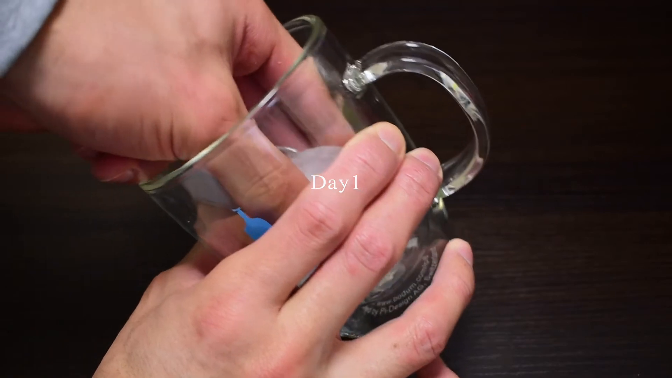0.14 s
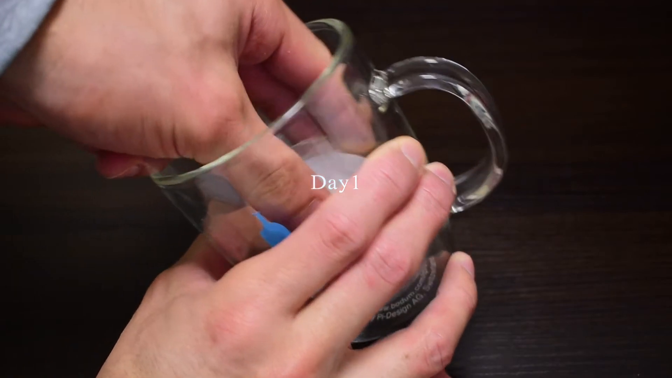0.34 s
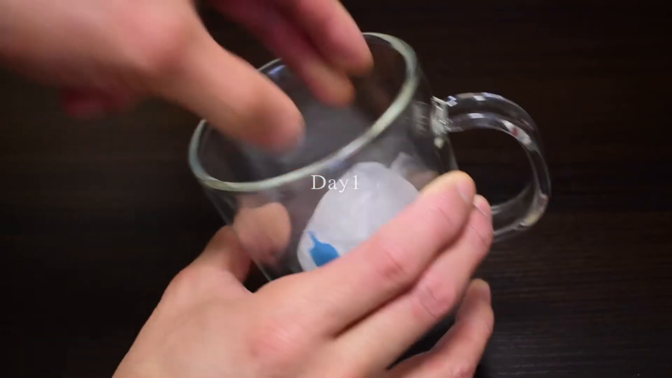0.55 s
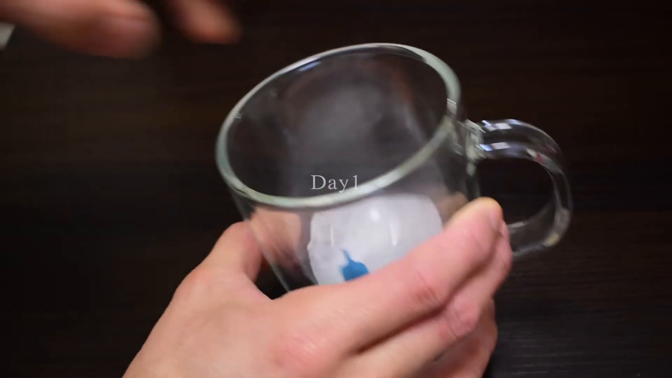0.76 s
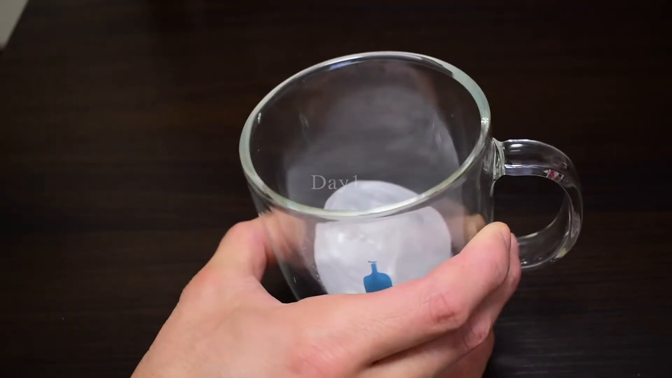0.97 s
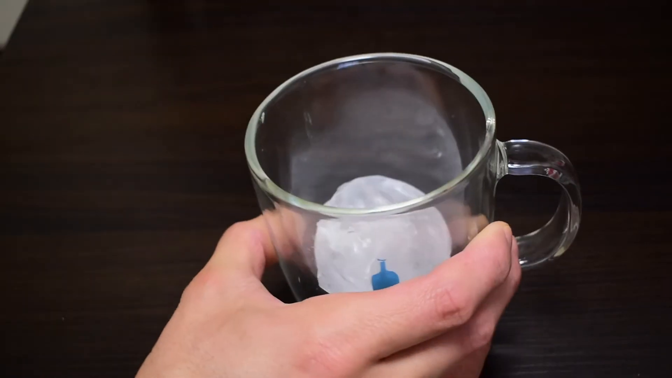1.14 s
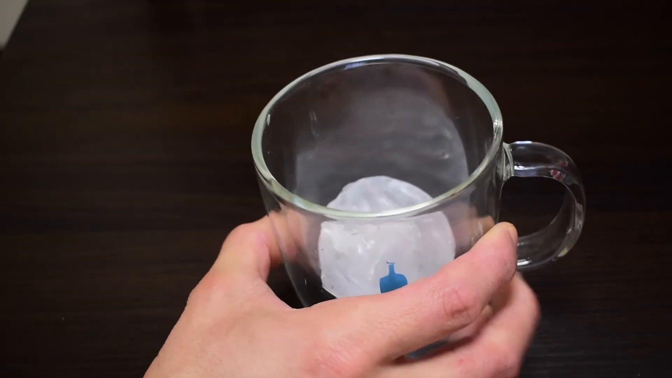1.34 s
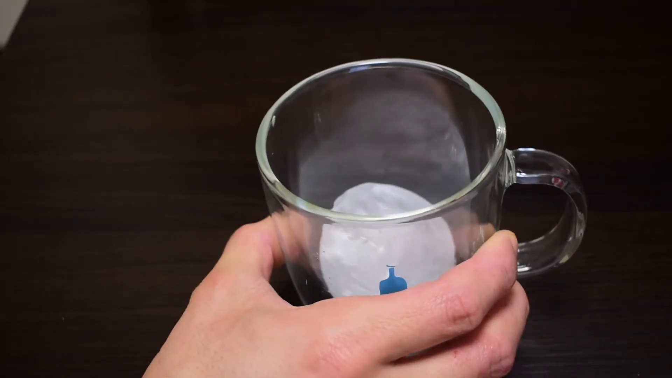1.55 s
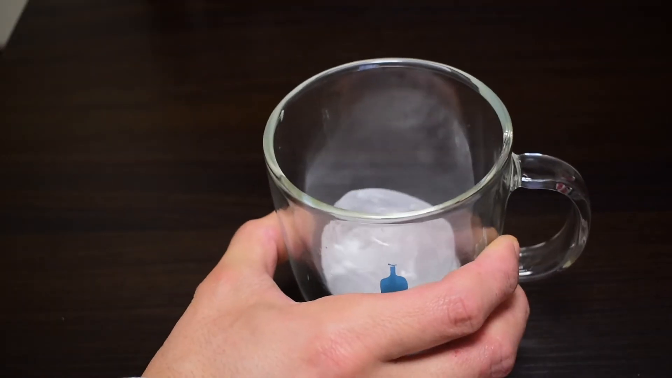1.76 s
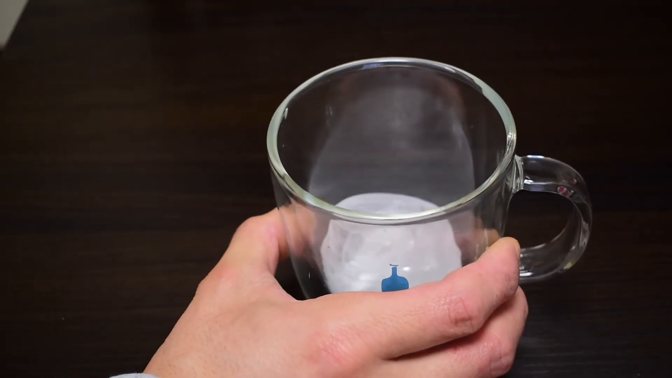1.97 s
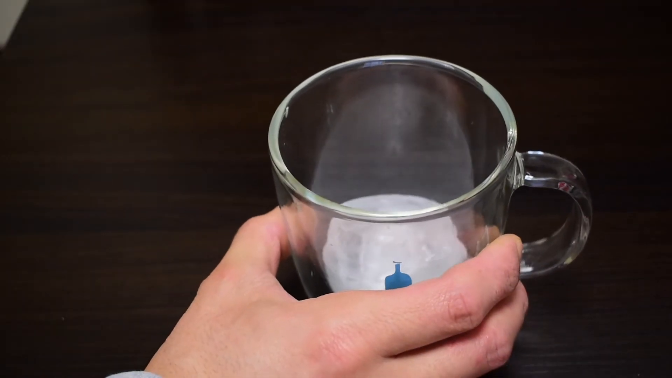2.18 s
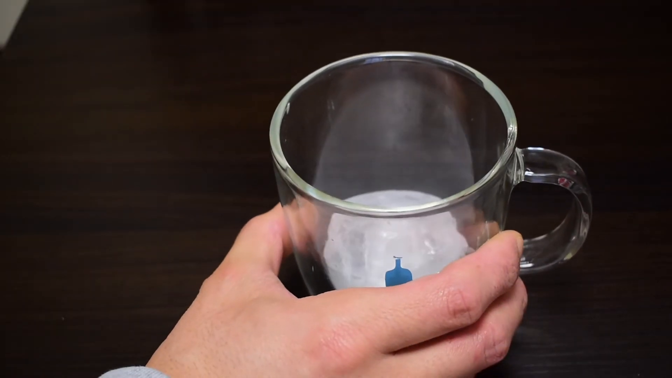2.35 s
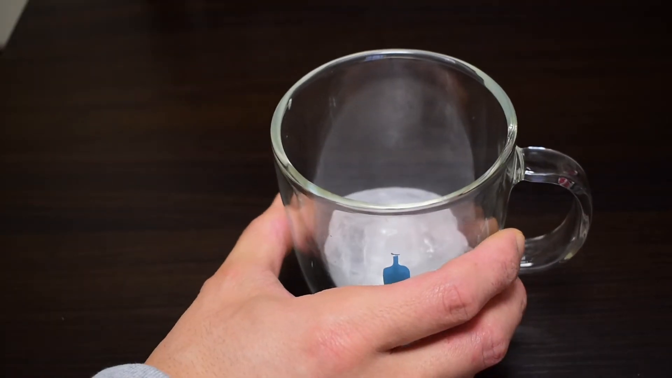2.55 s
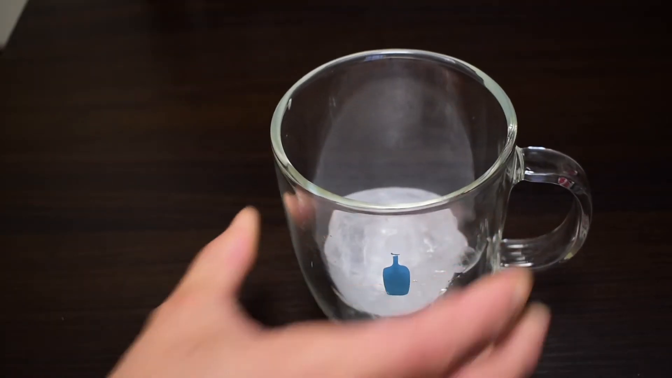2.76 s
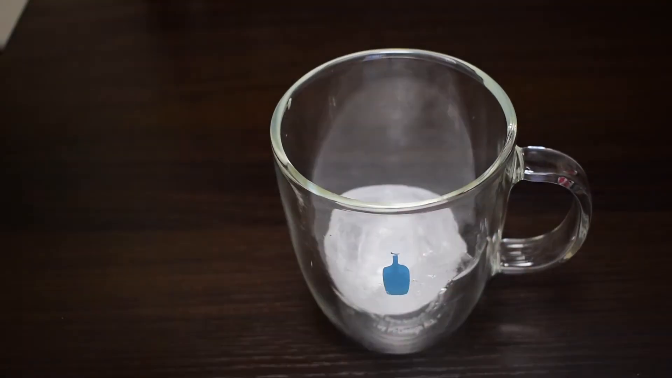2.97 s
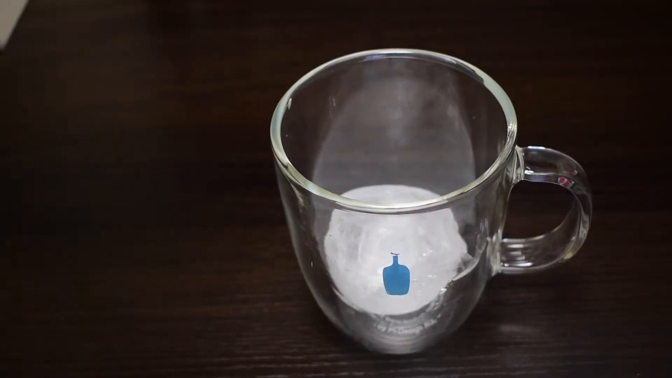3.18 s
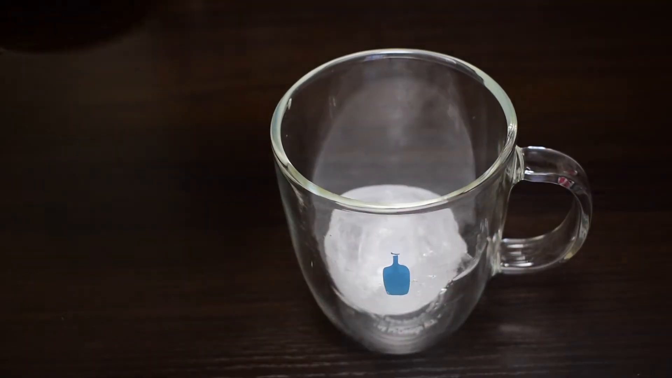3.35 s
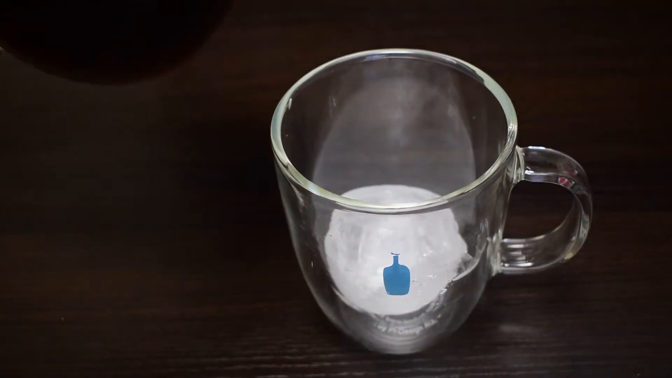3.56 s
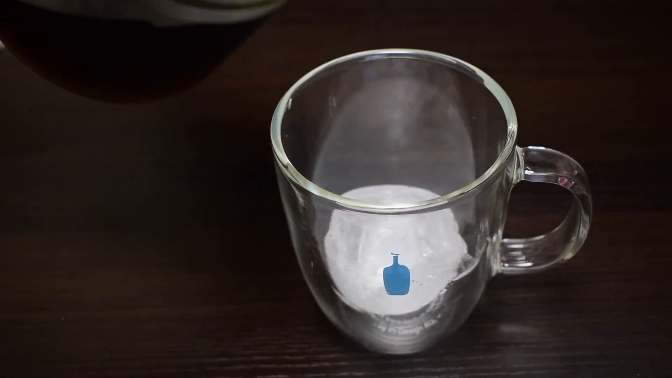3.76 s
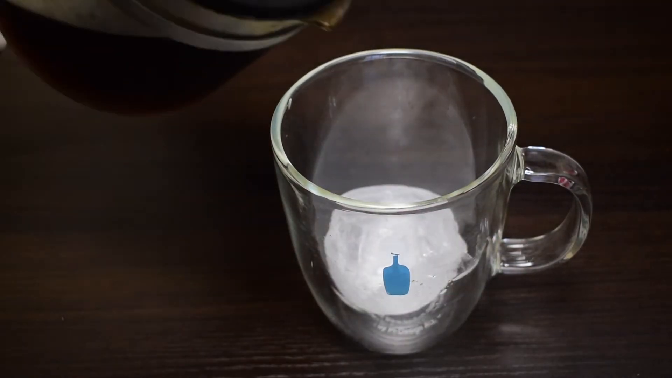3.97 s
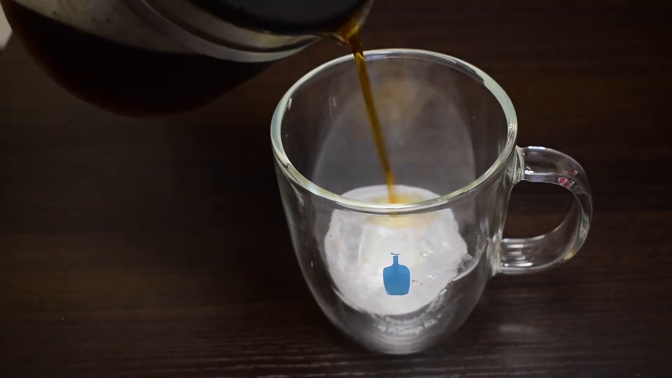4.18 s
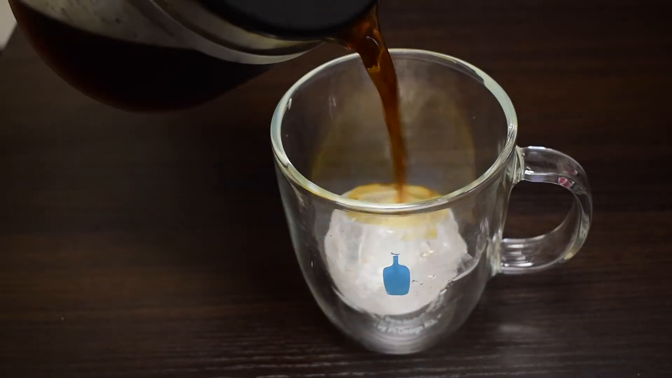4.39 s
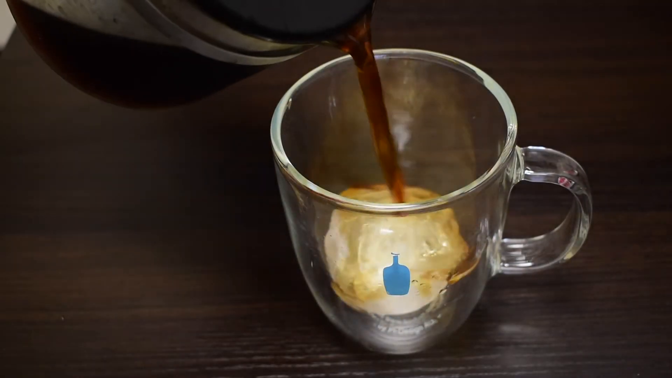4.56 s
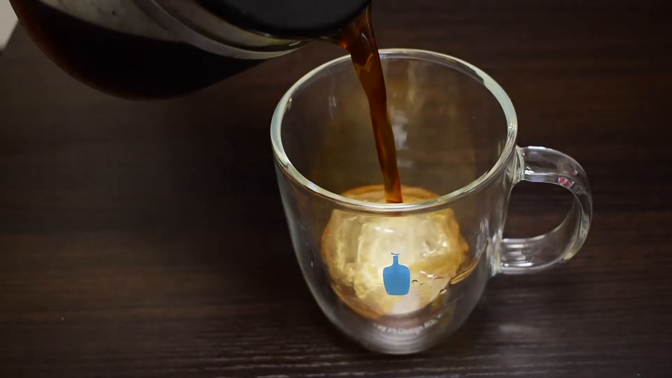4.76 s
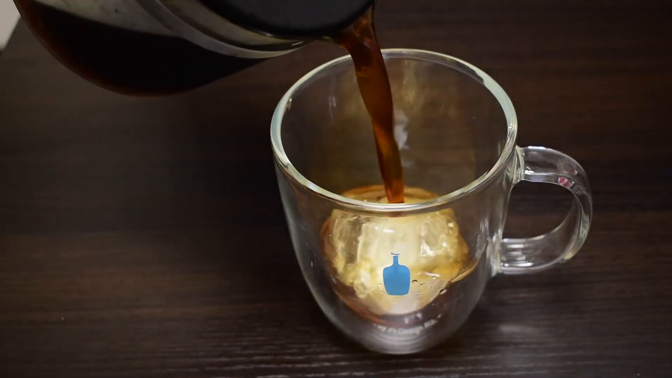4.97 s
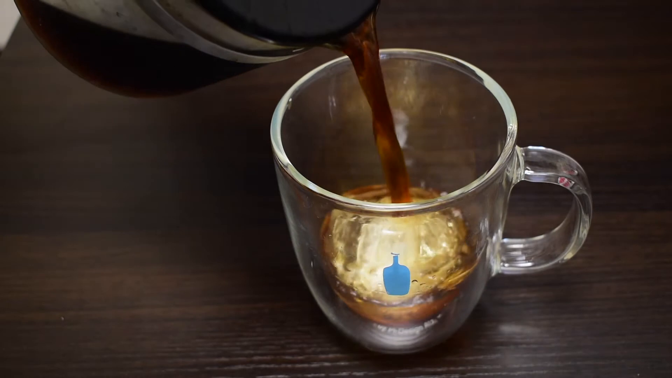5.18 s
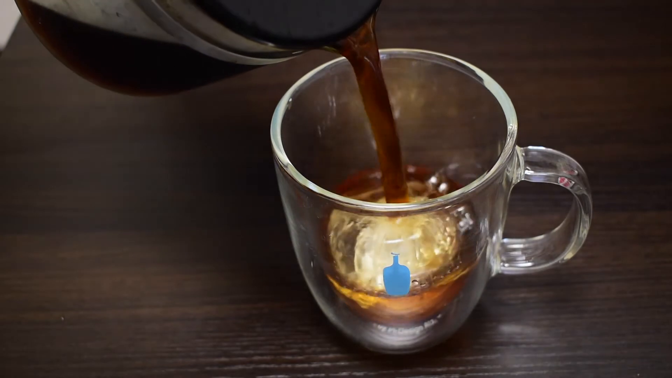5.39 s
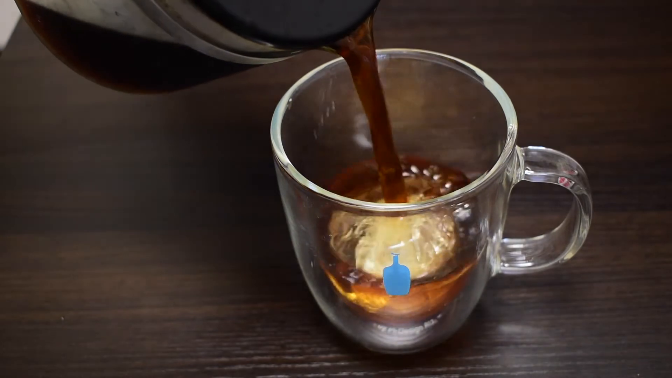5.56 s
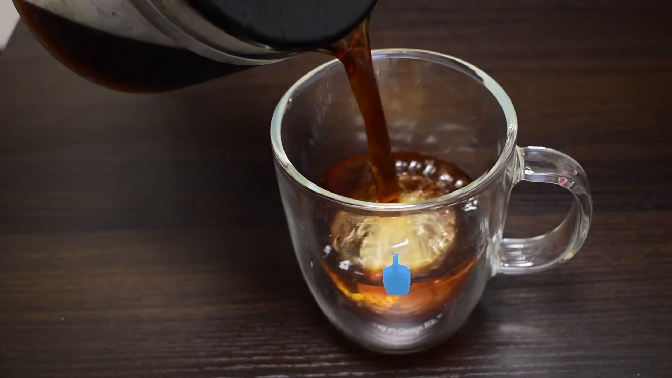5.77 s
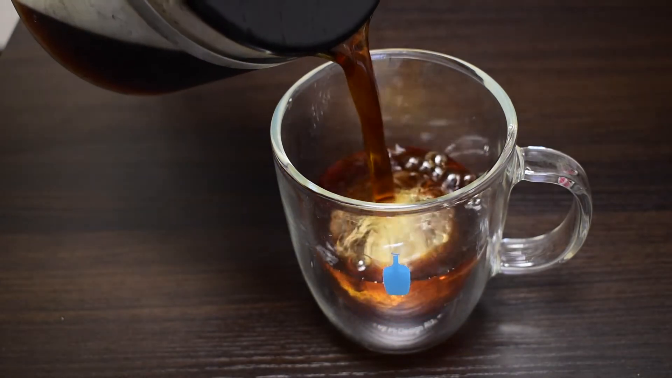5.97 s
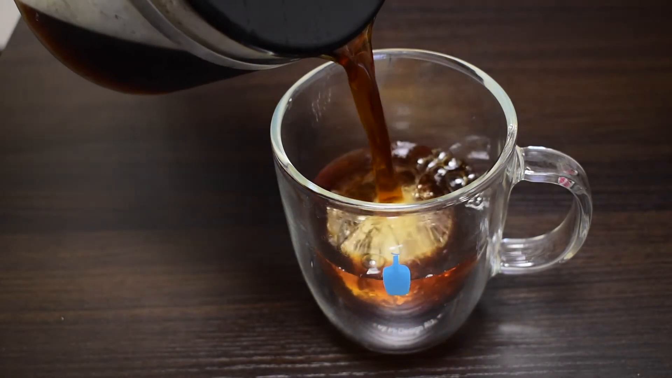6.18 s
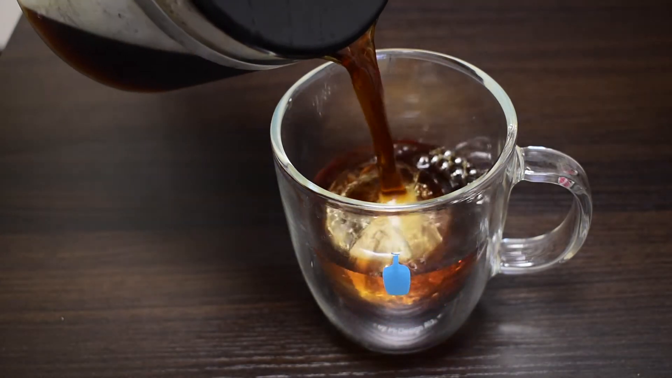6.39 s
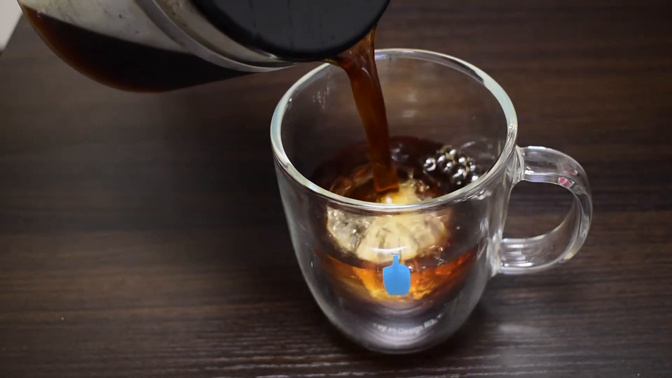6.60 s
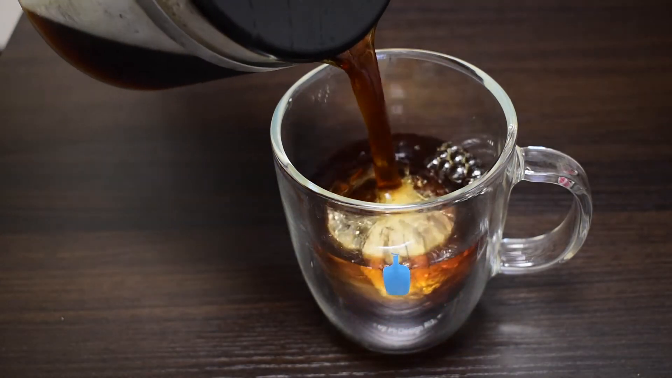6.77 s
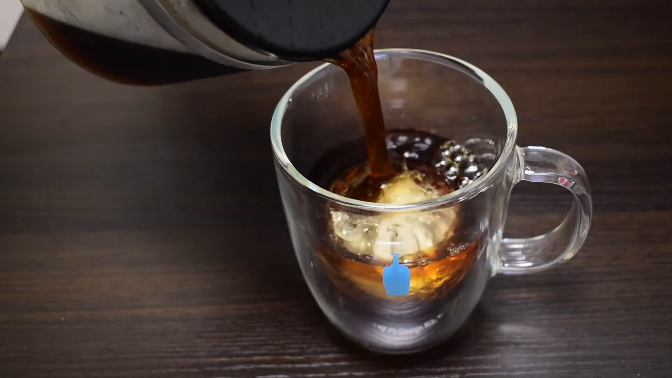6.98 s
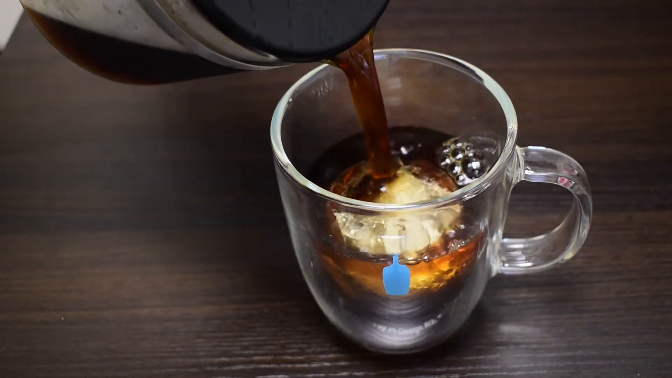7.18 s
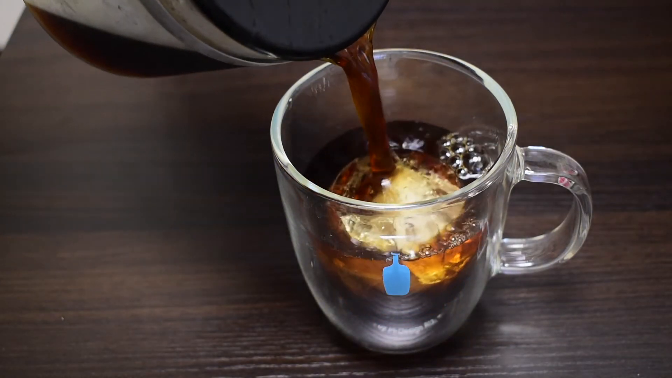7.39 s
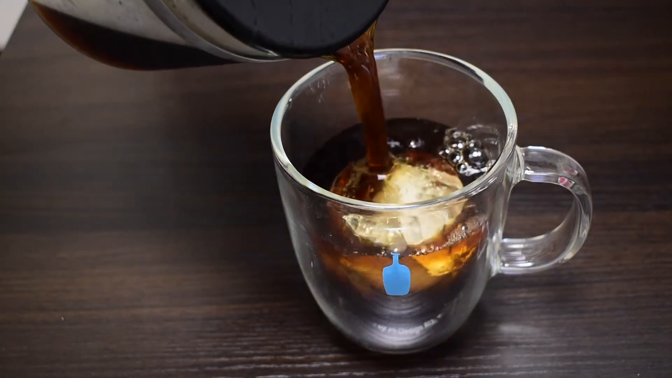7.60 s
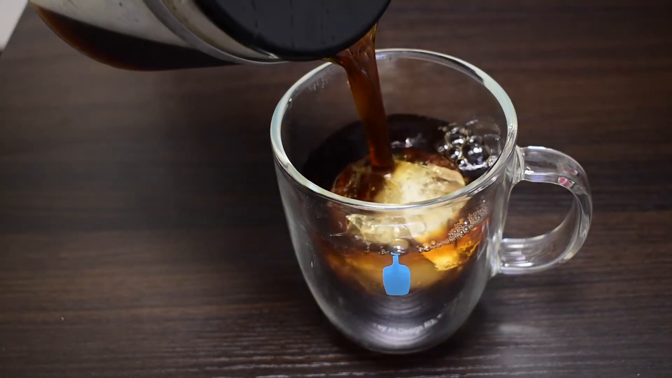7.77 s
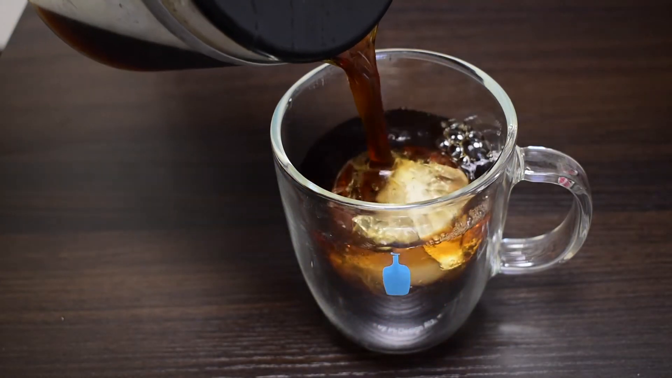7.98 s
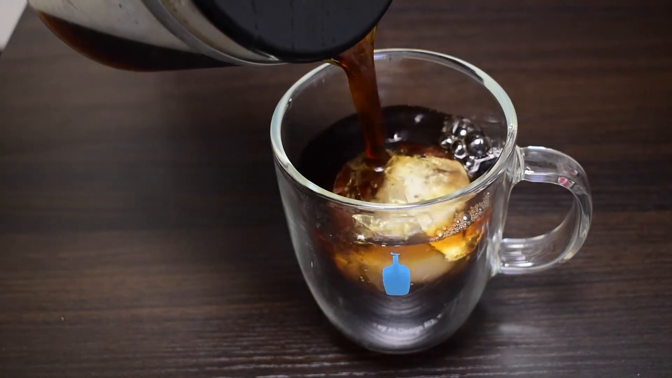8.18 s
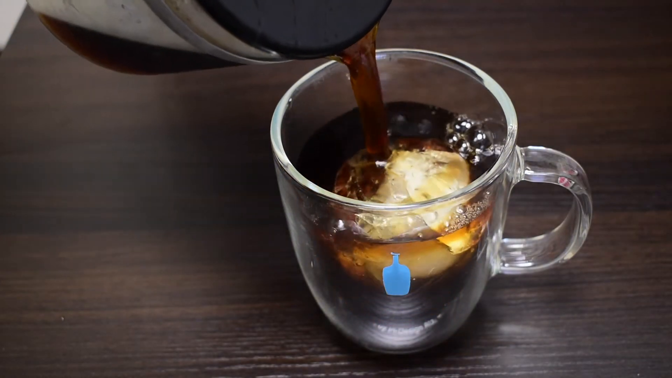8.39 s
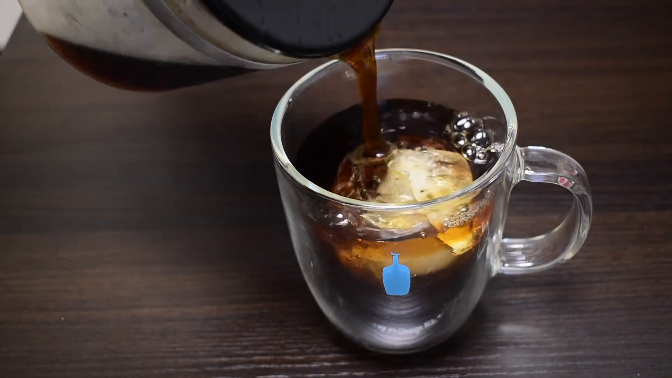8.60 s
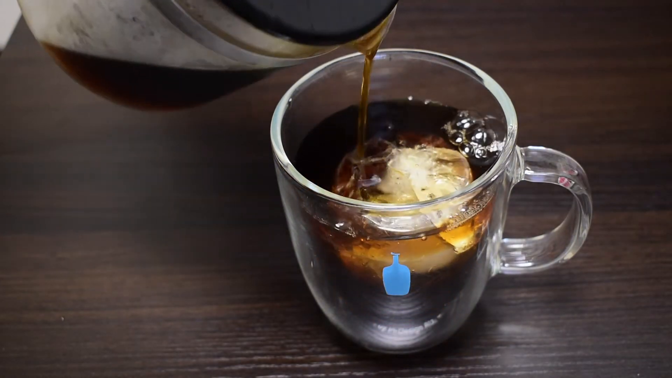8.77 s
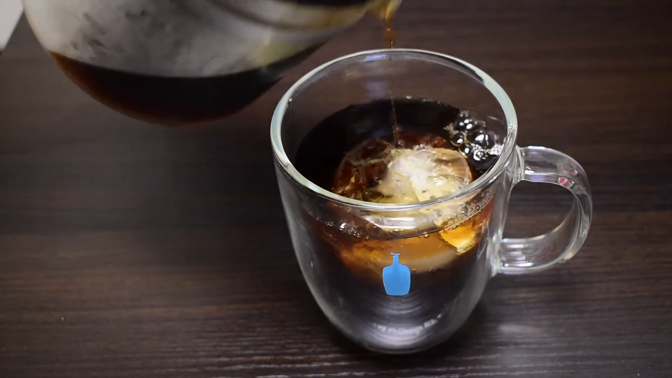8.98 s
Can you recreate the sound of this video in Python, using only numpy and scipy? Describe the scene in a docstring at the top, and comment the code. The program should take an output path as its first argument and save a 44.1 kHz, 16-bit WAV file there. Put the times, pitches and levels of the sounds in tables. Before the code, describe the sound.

Hollow glassy clunks come first as an ice ball is pushed into a mug, the strongest just before one second. Two wooden knocks follow as the mug is set down, with small ticks and a faint skin rub. Near silence, then crisp ice cracks, bubble plops and very soft fizz while coffee is poured gently. Close microphone, short dry room answer, low steady hush, sources nearly centred.

```python
"""In a small quiet room, a ball of ice is pushed into a double-walled glass mug and rattles. The mug is
set down on a wooden table and a hand slides off. Coffee is poured: ice cracks, bubbles plop, the pot tings once.
Blows are sums of dying tones and noise puffs, plops are short rising tones, fizz is many tiny tones;
hands and the room's hush are shaped noise. The room answers the blows, plops, fizz and ting."""
import sys
import numpy as np
from scipy import signal
from scipy.fft import rfft, irfft, next_fast_len
from scipy.io import wavfile

SR = 44100
rng = np.random.default_rng(int(sys.argv[2]) if len(sys.argv) > 2 else 0)


def log_audio(samples):
    """Write samples as a 16-bit WAV file to the path given in sys.argv[1]."""
    # one column per channel
    frames = np.atleast_2d(samples).T
    # limit to full scale, then quantise
    limited = np.clip(frames, -1, 1)
    pcm = np.round(limited * 32767).astype(np.int16)
    wavfile.write(sys.argv[1], SR, pcm)


N = 398663
SPAN = SR // 2  # samples worked out for each short sound: half a second
LEAD = 256  # samples kept free before each blow, as room for its filters
T = np.arange(SPAN) / SR
HZ = np.fft.rfftfreq(SPAN, 1 / SR)


def amp(db):
    """Decibels turned into a plain gain."""
    return 10 ** (np.asarray(db) / 20)


def along(points, hz):
    """Reads a curve of (pitch_hz, value) points on a log pitch axis."""
    point_hz, value = np.transpose(points)
    return np.interp(np.log(hz + 1), np.log(point_hz + 1), value)


def paired(spectra, alike, hz):
    """Mixes two unrelated spectra into a left and a right of the given likeness."""
    turn = np.arccos(np.clip(along(alike, hz), -1, 1)) / 2
    shared, apart = np.cos(turn) * spectra[0], np.sin(turn) * spectra[1]
    return np.array([shared + apart, shared - apart])


def noise(spectrum, alike):
    """Steady stereo noise of rms 1 with the given colour."""
    m = next_fast_len(N)
    hz = np.fft.rfftfreq(m, 1 / SR)
    coloured = rfft(rng.standard_normal((2, m))) * amp(along(spectrum, hz))
    x = irfft(paired(coloured, alike, hz), m)[:, :N]
    return x / x.std()


def level(rows):
    """Gain along a (time_s, level_db) curve, silent outside it."""
    s, db = np.transpose(rows)
    return amp(np.interp(np.arange(N) / SR, s, db, left=-120, right=-120))


def stroke(full_s, stop_s, db, swell_db, fade_db):
    """Gain that swells, holds and fades at steady dB a second."""
    t = np.arange(N) / SR
    before, after = np.maximum(full_s - t, 0), np.maximum(t - stop_s, 0)
    return amp(db - swell_db * before - fade_db * after)


def ringing(modes, scatter_db, damping=1, attack=0.0009, favoured_hz=(), favour_db=0, split=0):
    """All tones of a struck body, each at a new strength; the spot struck favours some.
    An uneven body splits each tone into a beating pair."""
    hz, db, t60 = np.transpose(modes)[:, :, None]
    db = db + scatter_db * rng.standard_normal(db.shape)
    for centre in favoured_hz:
        db = db + favour_db * np.exp(-(np.log(hz / centre) / 0.07) ** 2)
    t = T[:SPAN // 2]
    apart_hz = split * hz * hz / 10000 * rng.standard_normal(hz.shape)
    pairs = np.sin(2 * np.pi * hz * t) * np.cos(2 * np.pi * apart_hz * t)
    push = rng.choice([-1, 1], hz.shape)  # the blow pushes some tones in, others out
    dying = amp(db - 60 * t * damping / t60)
    ring = (push * dying * pairs).sum(0) * (1 - np.exp(-t / attack))
    return np.pad(ring, (0, SPAN - len(t)))


def burst(t60):
    """A dying puff of noise."""
    return amp(-60 * T / t60) * rng.standard_normal(SPAN)


def voiced(x, levels_db, edges_hz, low_hz):
    """Sets the peaks of the low, middle and high band; where the blow lands decides the balance."""
    thinned = rfft(np.roll(x, LEAD)) * (1j * HZ / (low_hz + 1j * HZ)) ** 3  # small bodies radiate no deep bass
    low = 1 / (1 + (HZ / edges_hz[0]) ** 6)
    high = 1 / (1 + (edges_hz[1] / (HZ + 1)) ** 6)
    bands = irfft(thinned * np.array([low, 1 - low - high, high]), SPAN)
    gains = amp(levels_db) / np.abs(bands).max(1)
    return (bands * gains[:, None]).sum(0)


# how long the room's main answer takes to fall 60 dB: (pitch_hz, fall_s)
ROOM_FALL = [(100, 0.3), (300, 0.22), (1000, 0.18), (5000, 0.21), (13000, 0.13)]
# how alike the answer is left and right: (pitch_hz, likeness, 1 = the same)
ROOM_ALIKE = [(300, 0.98), (2000, 0.98), (6000, 0.76), (15000, 0.097)]


def tails(count):
    """Stereo answers of the room: each pitch dies at its own speed over a fainter, longer tail."""
    hz, t, z = signal.stft(rng.standard_normal((count, 2, SPAN)), SR, nperseg=256)
    fall_db = -60 * t / along(ROOM_FALL, hz)[:, None]
    falling = z * (amp(fall_db) + amp(0.16 * fall_db - 30.0))
    x = signal.istft(falling, SR, nperseg=256)[1][..., :SPAN]
    x = x * (1 - np.exp(-T / 0.0019))  # the walls answer a moment late
    x = x * (1 + 0.3 * np.exp(-((T - .037) / 0.0012) ** 2))  # a far wall slaps back
    spectra = rfft(x / np.linalg.norm(x, axis=-1, keepdims=True))
    return [paired(pair, ROOM_ALIKE, HZ) for pair in spectra]


def add(out, s, x, room, wet_db):
    """Puts a sound and one of the room's answers to it at time s."""
    answer = room[rng.integers(len(room))]
    start = round(s * SR) - LEAD
    both = irfft(rfft(x) * (1 + amp(wet_db) * answer), SPAN)
    out[:, start:start + SPAN] += both * np.minimum(1, 20 * (.5 - T))  # fades over the last 50 ms


# colour of the room's hush: (pitch_hz, level_db per Hz)
AIR_COLOUR = [(12, -46), (20, -14), (49, -6.5), (123, -4), (285, -3), (328, 0), (367, -2.5), (678, -4.5),
              (923, -5), (1090, -6.5), (1220, -7), (4060, -13.5), (16000, -36)]
# how alike the hush is left and right: (pitch_hz, likeness, 1 = the same, below 0 = opposed)
AIR_ALIKE = [(60, 0.96), (180, 0.32), (550, 0.36), (1650, 0.22), (4970, -0.16), (15000, 0.18)]


def hush():
    """The room's steady hush: soft noise, spread differently over the two sides at each pitch."""
    return amp([[-59.9], [-59.1]]) * noise(AIR_COLOUR, AIR_ALIKE)  # dB left, right


# hands shifting on mug and table: (time_s, level_db)
RUSTLE = [(0.0, -56.5), (0.41, -51), (0.87, -57), (2.18, -55), (2.62, -58.5)]
# colour of that rustle: (pitch_hz, level_db per Hz)
HANDS_COLOUR = [(35, -43.5), (60, -15), (413, -5.5), (504, -6), (821, -8.5), (1120, -11.5), (3320, -20),
                (12000, -37.5), (15600, -71.5), (22000, -120)]


def rustle():
    """Hands shifting on mug and table make a soft noise that swells and sinks."""
    return level(RUSTLE) * noise(HANDS_COLOUR, [(300, 1.0), (5000, 0.96)])


# tones of the glass wall: (pitch_hz, level_db, time to fall 60 dB_s)
GLASS = [(437.8, -17.5, 0.071), (584.5, -6.5, 0.026), (693, -14, 0.05), (1186, -6.5, 0.08),
         (1311, -4, 0.046), (1560, -3.5, 0.019), (1746, -7.5, 0.014), (2450, -17, 0.1), (2770, -17, 0.11),
         (3135, -19, 0.13), (3750, -16.5, 0.056), (4035, -6, 0.027), (4394, -18, 0.023), (4772, -18, 0.04),
         (5790, -18.5, 0.1), (6436, -10, 0.023), (6918, -23.5, 0.12), (7830, -15, 0.056), (8405, -19, 0.09),
         (8710, -16.5, 0.021), (10460, -16, 0.02), (13000, -25.5, 0.035)]
# ice against glass: (start_s, body_peak_db, ring_peak_db, tick_peak_db, body_hz, favoured_ring_hz,
# grip as times faster dying)
CLINKS = [(0.036, -18.5, -31.5, -34.5, 1238, 8200, 3.15), (0.169, -17, -30, -26.5, 877, 3750, 0.86),
          (0.344, -12, -35, -18, 883, 2770, 1.13), (0.399, -31, -60, -47, 973, 4270, 1.2),
          (0.421, -25.5, -58, -46, 954, 4280, 1.2), (0.449, -15.5, -29, -35, 959, 3130, 0.94),
          (0.515, -32, -47, -39.5, 1190, 3130, 0.9), (0.554, -20.5, -38, -33, 918, 2430, 1.2),
          (0.63, -30.5, -48.5, -44, 695, 2430, 2.7), (0.747, -29.5, -71.5, -47, 900, 4270, 1.7),
          (0.774, -43, -49.5, -38, 1030, 4290, 0.41), (0.789, -12, -22.5, -29, 1106, 3160, 1.05),
          (0.796, -5.5, -16, -21.5, 974, 3120, 1.6), (0.805, -13, -24, -29, 1197, 2770, 0.58),
          (0.848, -13, -25.5, -28, 980, 2770, 0.89), (0.874, -30, -35, -28.5, 1270, 2770, 1.1),
          (1.057, -35.5, -65, -37.5, 924, 2830, 2), (1.082, -59, -66, -35.5, 1010, 3110, 3.3),
          (1.111, -36.5, -53, -59, 984, 4010, 1.34), (1.127, -52, -71.5, -33.5, 1034, 3060, 2.4),
          (1.135, -51, -65, -37, 990, 3330, 2), (1.156, -35.5, -73, -32.5, 967, 2520, 1.15),
          (1.227, -63, -38.5, -47, 955, 2520, 1.9), (1.25, -30.5, -62, -41, 944, 4030, 0.97),
          (1.283, -39, -40.5, -38, 875, 4200, 1.8), (1.881, -28.5, -41.5, -27.5, 987, 6450, 0.8),
          (1.935, -28, -52, -35, 960, 6450, 0.9), (1.974, -39, -63, -38, 1010, 2450, 0.89),
          (2.201, -22, -36.5, -40, 992, 2430, 1.05), (2.622, -44.5, -49, -54.5, 990, 2470, 1.7)]
# the ice ticks on the side wall, then, once seated, on the bottom
SEATED_S, SIDE_TICK_HZ, BOTTOM_TICK_HZ = 0.74, 6390, 8550
BODY_T60_S = 0.048  # time to fall 60 dB for the air in the mug, under a grip of 1


def clinks(out, room):
    """Each contact rings the glass wall and the air inside the mug; a firm grip shortens both."""
    for s, body_db, ring_db, tick_db, body_hz, ring_hz, grip in CLINKS:
        tick_hz = SIDE_TICK_HZ if s < SEATED_S else BOTTOM_TICK_HZ
        wall = ringing(GLASS, scatter_db=4.5, damping=grip, attack=0.00049,
                       favoured_hz=(body_hz, ring_hz, tick_hz, 1.55 * tick_hz), favour_db=10.0, split=0.0055)
        air = ringing([(body_hz, 4, BODY_T60_S / grip ** 1.44)], scatter_db=2.0, attack=0.00021)
        x = wall + air + .5 * burst(0.0034) + 0.18 * burst(0.039)
        x = voiced(x, [body_db, ring_db, tick_db], edges_hz=[2000, .82 * tick_hz], low_hz=196.1)
        add(out, s, x, room, wet_db=-0.5)


def wood(x, gain=1.4, top_hz=3100):
    """Wood passes little treble."""
    return gain * irfft(rfft(x) / (1 + 1j * HZ / top_hz) ** 3, SPAN)


# tones of the table top: (pitch_hz, level_db, time to fall 60 dB_s)
TABLE = [(135, -17, 0.16), (220, -6.5, .07), (310.5, 6.5, 0.047), (422, -8, 0.042), (536, -2.5, .05),
         (609, -6, 0.046), (771, -6, 0.036), (991.6, -7.5, 0.062), (1106, -10.5, .04), (1195.4, -8, .04),
         (1310, -11, .035), (1556, -14, 0.025), (2070, -13, .012), (2770, -15, .012)]
# the mug against the table: (start_s, thud_peak_db, knock_peak_db, tap_peak_db)
KNOCKS = [(1.3, -52, -45.5, -58), (1.339, -49, -50, -66), (1.5831, -10, -9, -39.5), (1.84, -45.5, -43, -48),
          (1.8782, -5.5, 1, -23.5), (1.888, -10, -6, -30), (2.186, -30, -31, -60), (2.193, -21.5, -26, -50),
          (2.401, -40.5, -46, -64), (2.441, -46, -49, -64), (2.59, -41, -71, -58),
          (3.523, -60.5, -47.5, -81.5), (3.581, -48, -54.5, -72), (3.63, -63, -52, -72.5),
          (4.168, -55, -53.5, -59), (8.85, -60.5, -63.5, -62.5)]
CONTACT_S, SOFTER = 0.00086, 0.22  # contact time of a 0 dB thud; dB of longer contact for each dB weaker


def knocks(out, room):
    """The table top booms; a soft landing swells more slowly."""
    for s, thud_db, knock_db, tap_db in KNOCKS:
        contact_s = CONTACT_S * amp(-SOFTER * thud_db)
        swell = (1 - np.exp(-T / contact_s)) ** 2
        x = swell * (ringing(TABLE, scatter_db=4.5, attack=0.00072) + wood(burst(0.041)))
        x = voiced(x, [thud_db, knock_db, tap_db], edges_hz=[620, 3300], low_hz=68.73)
        add(out, s, x, room, wet_db=-3.0)


# colour of sliding skin: (pitch_hz, level_db per Hz)
SKIN_COLOUR = [(180, -29.5), (300, 5), (737, -5.5), (994, -0.5), (1930, -0.5), (3580, -0.5), (10600, -16.5),
               (16000, -27)]
# skin sliding on glass and wood: (full_from_s, stops_at_s, level_db, swell_db_per_s, fade_db_per_s)
RUBS = [(2.783, 2.849, -50, 86, 1501.5), (2.925, 2.993, -57, 897.5, 151)]


def rubs():
    """Skin sliding on glass and wood: short swells of noise."""
    return sum(stroke(*row) for row in RUBS) * noise(SKIN_COLOUR, [(1000, 1.0), (10000, 0.72)])


# tones of the ice and the glass around it: (pitch_hz, level_db, time to fall 60 dB_s)
ICE = [(1037, -1, .06), (1225, -6.5, .06), (1420, -2, .03), (1725, -5, .04), (2486, -14.5, .1),
       (3128, -12.5, .12), (4050, -12.5, .05), (5520, -11, .2), (6210, -10, .05), (6961, -15, .04),
       (8080, -10, .11), (9100, -11.5, .03), (10020, -1.5, .03), (10600, -6, .03), (11500, -15.5, 0.034),
       (14300, -8.5, .03)]
# cracks in the warming ice, and one bright slap back from a wall (at 6.553 s):
# (start_s, low_peak_db, middle_peak_db, high_peak_db, ring_hz, ring_share 0-1)
CRACKS_AND_SLAP = [(4.454, -67.5, -68.5, -43, 5500, 0.15), (4.5537, -25, -17, -19.5, 3960, 0.08),
                   (4.661, -40.5, -33.5, -30, 4050, 0.28), (4.763, -59.5, -46, -59, 4200, 0.7),
                   (4.819, -34.5, -42, -25.5, 4140, 0.9), (4.8665, -3, -8, 4.5, 5600, 0.75),
                   (5.142, -39.5, -46, -40, 4170, 1), (5.152, -42, -31, -28.5, 4280, 0.35),
                   (5.223, -38, -43, -40, 4800, 0.66), (5.247, -39, -42, -33, 4380, 0.6),
                   (5.267, -31.5, -15.5, -12, 4420, 0.35), (5.45, -63, -45, -40, 4440, 0.8),
                   (5.459, -67.5, -44.5, -33.5, 5520, 0.57), (5.477, -64, -41, -42, 3440, 0.7),
                   (5.495, -54, -36, -24, 3910, 0.75), (5.502, -44.5, -56, -21.5, 6200, 0.34),
                   (5.565, -33, -35.5, -66, 2840, 0), (5.578, -45.5, -58, -27, 4970, 0),
                   (5.858, -50, -65, -46, 3520, 0.7), (5.936, -59, -49.5, -41, 5670, 0.7),
                   (6.106, -59, -61, -36, 5300, 0.32), (6.231, -44.5, -27, -35.5, 5750, 0.62),
                   (6.374, -46.5, -46.5, -43, 3770, 0.92), (6.5166, -25.5, -15.5, -11.5, 4550, 0.21),
                   (6.553, -51, -26, -14, 4570, 0.8), (6.785, -43, -54.5, -40.5, 5280, 0.03),
                   (6.858, -60.5, -50, -40, 4690, 0.56), (7.089, -59, -43.5, -53.5, 4480, 0.58),
                   (7.39, -59.5, -50, -50.5, 3920, 0.55), (7.822, -51.5, -46, -69, 3143, 0.45),
                   (8.026, -61, -44, -50.5, 2690, 0.4), (8.65, -61, -64, -52.5, 4400, 0.49)]
BELOW, ABOVE, FISSURE_T60_S = 0.24, 1.4, 0.022  # lower and upper ring as parts of the middle one; 60 dB fall


def cracks_and_slap(out, room):
    """A short snap, then a ring in three clusters; strong cracks ring the ball and jolt the table.
    The slap back from a wall is built the same way."""
    for s, low_db, middle_db, high_db, ring_hz, share in CRACKS_AND_SLAP:
        clusters = [(part * ring_hz * (1 + .05 * step), db - 4 * abs(step), FISSURE_T60_S)
                    for part, db in ((BELOW, 1.5), (1, .6), (ABOVE, -1.5))
                    for step in (-1.9, .5, 2.0, 2.5)]
        fissure = ringing(clusters, scatter_db=6.5, attack=.0001, split=0.02)
        ball = ringing(ICE, scatter_db=6.0, attack=.0001, split=0.003, favoured_hz=(ring_hz,), favour_db=11.5)
        ring = fissure + amp(0.46 * high_db - 1.6) * ball
        x = share * (0.27 * ring + 1.2 * burst(0.0075)) + (1 - share) * 1.2 * burst(0.0058)
        x = voiced(x, [low_db, middle_db, high_db], edges_hz=[2500, 6100], low_hz=450)
        table = ringing(TABLE, scatter_db=2.5, damping=1.6, attack=0.0012)
        jolt = amp(low_db - 31) * np.roll(table, LEAD)
        add(out, s, x + jolt, room, wet_db=-1.5)


# short rising tones: bubbles, and a few rings of ice and glass: (start_s, level_db, pitch_hz)
RISING_TONES = [(4.507, -45.5, 5280), (5.109, -44, 700), (5.129, -35, 1760), (5.166, -27, 1143),
                (5.182, -26.5, 2165), (5.223, -31.5, 1390), (5.27, -25.5, 2900), (5.436, -46.5, 780),
                (5.487, -40, 3790), (5.529, -38, 3040), (5.543, -38.5, 540), (5.564, -40, 2000),
                (5.586, -46, 1106), (5.594, -40.5, 3020), (5.614, -43, 1860), (5.719, -48.5, 1783),
                (5.825, -48.5, 547), (5.833, -42, 2990), (5.86, -40, 2760), (6.013, -48.5, 1995),
                (6.037, -49.5, 2920), (6.059, -49.5, 1700), (6.105, -41.5, 2800), (6.161, -43, 805),
                (6.19, -48, 637), (6.215, -44.5, 425), (6.235, -44, 770), (6.249, -30.5, 1570),
                (6.251, -36, 2780), (6.36, -37, 1380), (6.36, -48, 3900), (6.375, -40, 1380),
                (6.421, -44, 3850), (6.433, -34, 3020), (6.434, -37, 1440), (6.436, -41.5, 4430),
                (6.45, -30, 1380), (6.45, -37, 2910), (6.489, -40.5, 4070), (6.52, -17, 2780),
                (6.62, -27.5, 2970), (6.78, -41.5, 2854), (6.855, -44, 2930), (6.899, -47, 3790),
                (7.582, -49.5, 3770), (7.678, -49, 3800), (7.718, -46, 2860), (7.821, -44, 2154),
                (7.824, -47, 4250), (7.831, -41, 2580), (7.913, -47, 3610), (7.924, -47.5, 1960),
                (7.924, -36.5, 3230), (7.933, -38.5, 3040), (7.934, -38, 4550), (8.025, -40.5, 2190),
                (8.034, -44, 2120), (8.063, -46, 2090), (8.09, -41.5, 2740), (8.368, -42.5, 3076),
                (8.377, -48, 3100)]
TONE_T60_S, SHORTENS = 0.033, 0.52  # 60 dB fall at 1 kHz; power of pitch by which high tones die sooner


def rising_tones(out, room):
    """Damped tones with a climbing pitch, as of a bubble nearing the surface, each with two fainter ones beside it.
    A few stand for rings of ice and glass."""
    for s, db, hz in RISING_TONES:
        t60 = TONE_T60_S * (1000 / hz) ** SHORTENS
        # one row each: the main tone and its two companions
        delay = np.abs(rng.standard_normal((3, 1))) * [[0], [.005], [.009]]
        detune = rng.standard_normal((3, 1)) * [[0], [.07], [.12]]
        t = np.maximum(T - delay, 0)
        phase = 2 * np.pi * hz * (1 + detune) * (t + .03 * t * t / t60)
        dying = amp(db + np.array([[0], [-6.5], [-10.5]]) - 60 * t / t60)
        x = dying * np.sin(phase) * (1 - np.exp(-t / 0.00035))
        add(out, s, np.roll(x.sum(0), LEAD), room, wet_db=-3.5)


# swells of fizz, two of them hiss trailing a strong crack: (peak_s, level_db)
FIZZ_SWELLS = [(4.89, -61), (5.27, -59), (5.58, -64), (6.21, -61), (6.46, -56), (7.95, -67.5)]
# the fizz lasts to the end of the scene: its grains are spread up to a time beyond it; steady level
FIZZ_START_S, GRAINS_UNTIL_S, STEADY_DB = 4.9, 11, -72.5


def fizz(room, count=900):
    """Many tiny bubbles, a few louder than the rest; now and then the fizz swells, twice as hiss after a crack."""
    when, pitch, size = rng.random((count, 3)).T
    hz = 900 * 6.5 ** pitch[:, None]
    t = T[:1300]
    dying = amp(-3 * np.log(size[:, None] + .03) - 60 * t * hz / 35)
    climbing = np.sin(2 * np.pi * hz * t * (1 + 8 * t))
    grains = dying * climbing * (1 - np.exp(-t / 0.001))
    starts = ((FIZZ_START_S + when * (GRAINS_UNTIL_S - FIZZ_START_S)) * SR).astype(int)
    at = starts[:, None] + np.arange(len(t))
    plain = np.bincount(at.ravel(), grains.ravel(), N)[:N]
    wet = plain + 0.5 * signal.fftconvolve(plain[None], irfft(room[0], SPAN), axes=1)[:, :N]
    swells = sum(stroke(s, s, db, swell_db=140, fade_db=120) for s, db in FIZZ_SWELLS)
    flow = amp(STEADY_DB) + swells
    return flow * wet / wet[:, at.min():at.max()].std()


# tones of the pot: (pitch_hz, level_db, time to fall 60 dB_s)
POT = [(933, 0.5, 0.25), (3090, -7, 0.058), (4350, -14, 0.054)]
TING_S, TING_DB = 8.82, -43.5


def ting(out, room):
    """The pot tipped back gives one faint note with a small tick."""
    x = ringing(POT, scatter_db=2, attack=0.00069) + .3 * burst(0.0044)
    add(out, TING_S, amp(TING_DB) * np.roll(x, LEAD), room, wet_db=-6.5)


def scene():
    """Blows and rising tones in the room, hands on glass and wood, fizz and the room's hush."""
    out, room = np.zeros((2, N + SPAN)), tails(count=16)
    for source in (clinks, knocks, cracks_and_slap, rising_tones, ting):
        source(out, room)
    near = out[:, :N] + rustle() + rubs() + fizz(room)
    return near * amp([[-.6], [.6]]) + hush()  # near sounds sit slightly to the right


# how strongly the microphone picks up each pitch: (pitch_hz, gain_db)
MICROPHONE = [(20, -9), (45, -5.5), (100, 1), (9000, 0.5), (12000, 0.5), (16000, -9.5)]
TOP_HZ = 16400  # nothing is kept above this


def record(dry):
    """The loudest blows are flattened; the microphone thins the deep bass and top octave, up to a band limit."""
    flattened = .9 * dry / (1 + np.abs(dry) ** 10) ** (1 / 10)
    m = next_fast_len(N + SPAN)
    hz = np.fft.rfftfreq(m, 1 / SR)
    edge = np.clip((TOP_HZ - hz) / 500, 0, 1) ** 2
    return irfft(rfft(flattened, m) * edge * amp(along(MICROPHONE, hz)), m)[:, :N]


dry = scene()
out = record(dry)
log_audio(out)
```